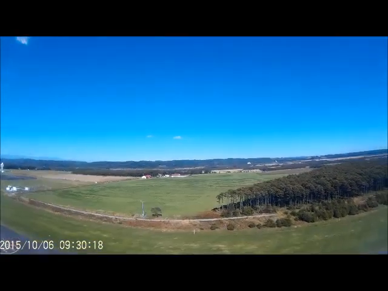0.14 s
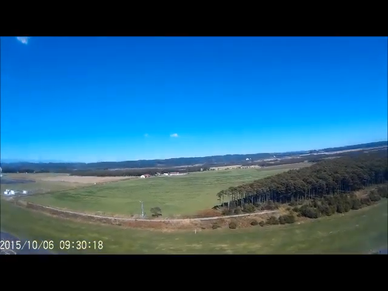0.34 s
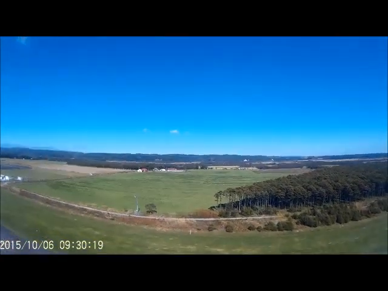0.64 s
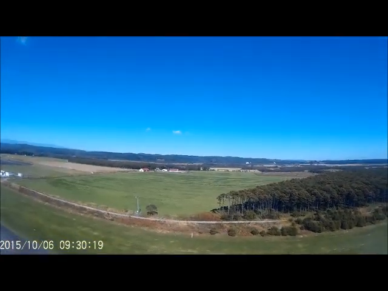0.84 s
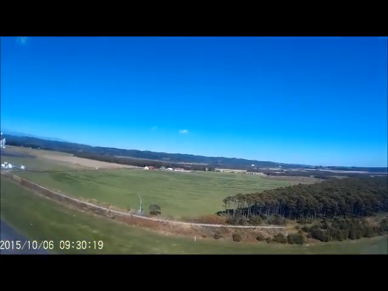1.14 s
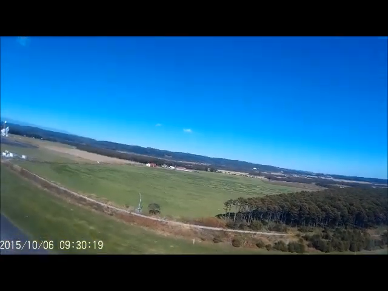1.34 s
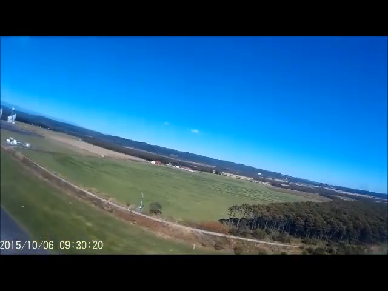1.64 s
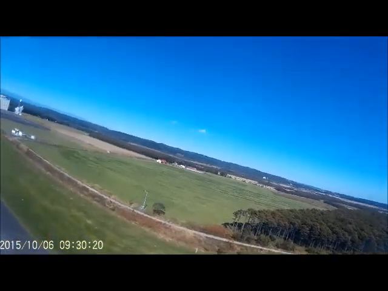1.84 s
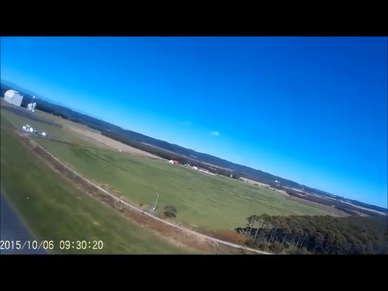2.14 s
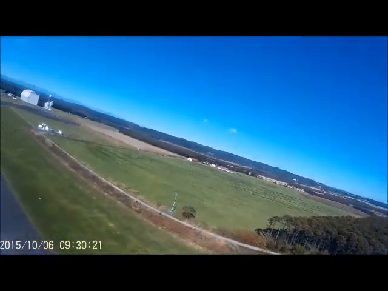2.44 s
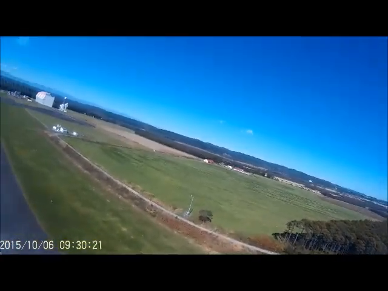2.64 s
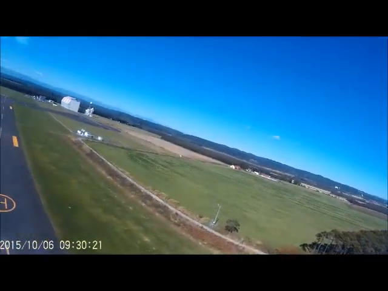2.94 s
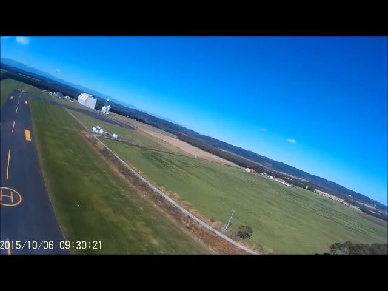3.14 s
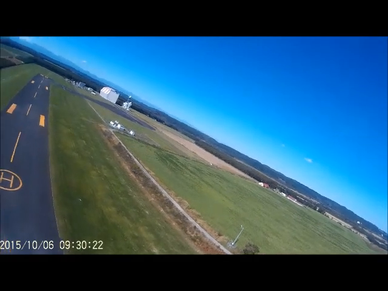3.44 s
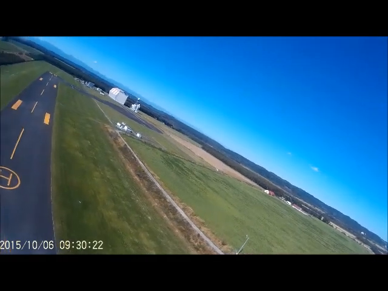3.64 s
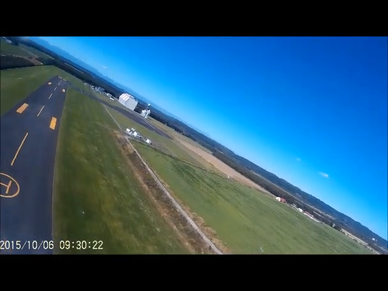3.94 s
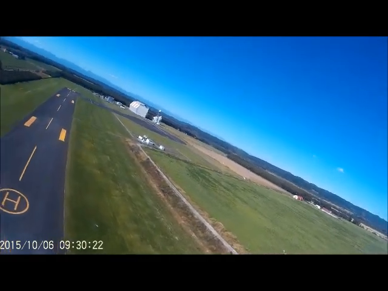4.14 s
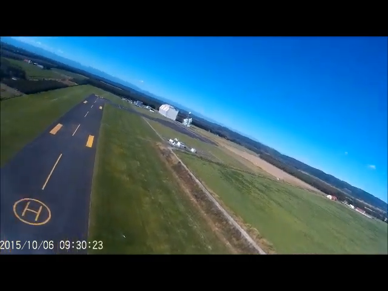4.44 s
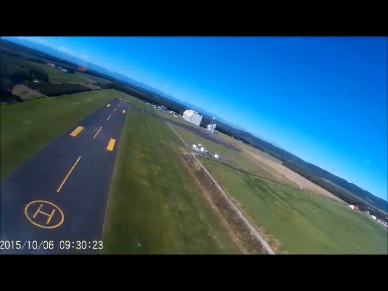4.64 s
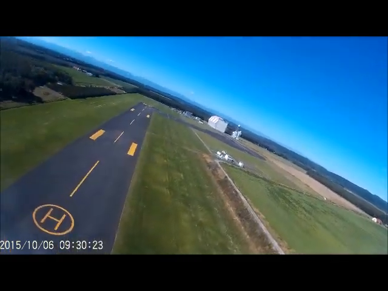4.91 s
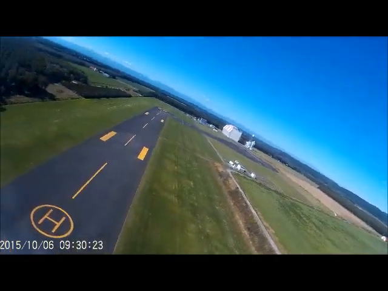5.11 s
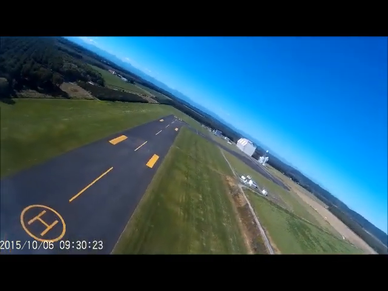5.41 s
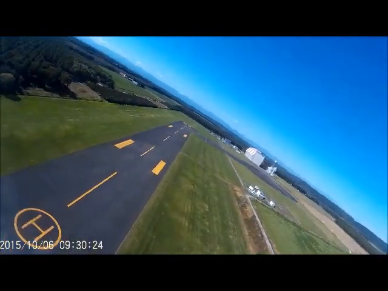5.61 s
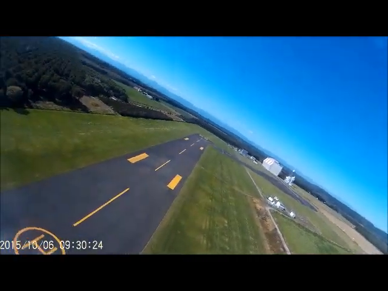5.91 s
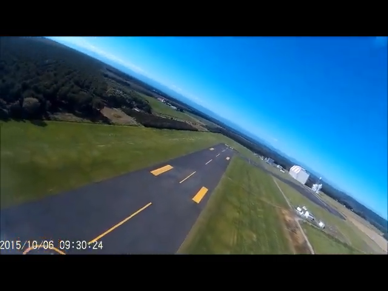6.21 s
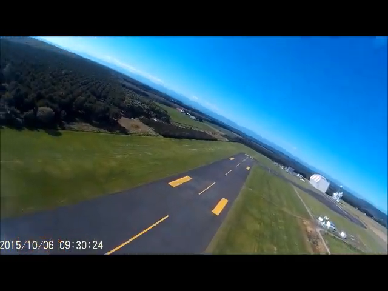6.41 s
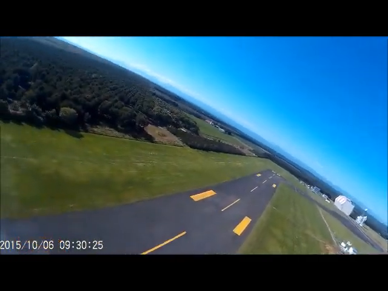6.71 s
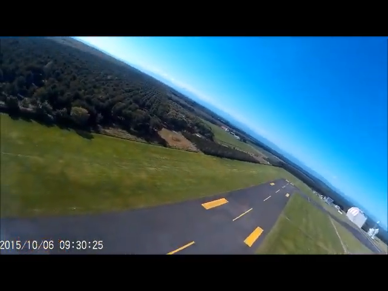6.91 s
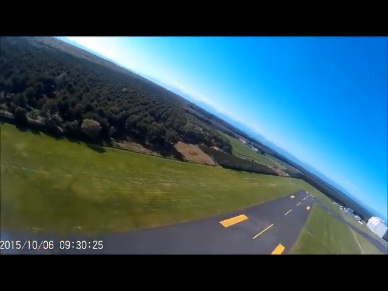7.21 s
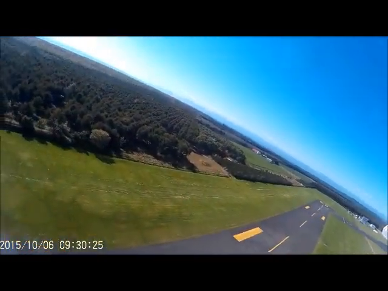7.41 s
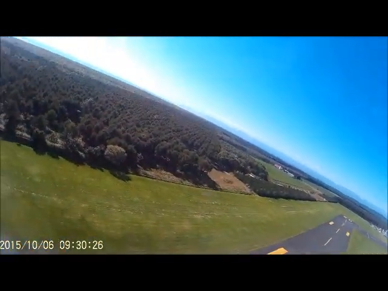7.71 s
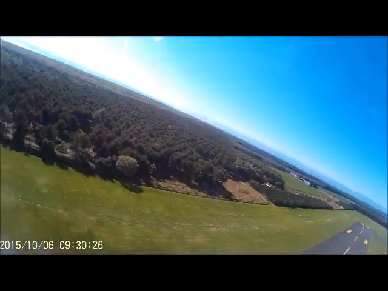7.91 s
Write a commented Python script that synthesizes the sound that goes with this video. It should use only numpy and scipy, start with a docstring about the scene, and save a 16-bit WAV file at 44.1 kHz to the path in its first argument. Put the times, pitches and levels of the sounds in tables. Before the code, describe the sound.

A small electric model plane flies over an airfield, heard from a microphone fixed to its body. The propeller drones and the motor whines without a break, the pitch wavering over a soft rush of air. About halfway through, the pitch sinks a little and the whine stands out more. The panels buzz lightly, the airstream slowly grows, and the body ticks once just past the middle and again at the end.

```python
"""A propeller's drone and a motor's whine, close up: a small electric model plane banks over an airfield,
heard from the microphone of a camera fixed to its airframe. One shaft turns the two blades and the
14-pole motor and sets their pitch; the throttle eases back halfway through. The blades shake the frame,
and the harder the shake, the more the panels buzz and the camera mount chatters.
The airstream slowly grows, and the frame ticks twice."""
import sys
import numpy as np
from scipy import signal
from scipy.fft import rfft, irfft, next_fast_len
from scipy.io import wavfile
from scipy.ndimage import uniform_filter1d, map_coordinates

SR = 44100
rng = np.random.default_rng(int(sys.argv[2]) if len(sys.argv) > 2 else 0)


def generate_wav(signal):
    """Clip the signal to [-1, 1] and save it as 16-bit WAV at the path in sys.argv[1]."""
    frames = np.transpose(np.atleast_2d(signal))
    scaled = np.clip(frames, -1, 1) * 32767
    pcm = np.round(scaled).astype(np.int16)
    wavfile.write(sys.argv[1], SR, pcm)


N = 355446
USUAL_SHAKE_DB = -30  # blade tone level at which shake_db is 0; every "grows" is dB per dB of shake


def amp(db):
    """Decibels to gain."""
    return 10 ** (np.asarray(db) / 20)


def unit(x):
    """Scale to rms 1."""
    return x / np.sqrt(np.mean(x ** 2) + 1e-20)


def curve(rows):
    """Join (time, value) rows with straight lines, one value per sample."""
    return np.interp(np.arange(N) / SR, *np.transpose(rows))


def wobble(knots_per_s):
    """A smooth random curve."""
    return map_coordinates(rng.standard_normal(4000), [np.arange(N) * knots_per_s / SR], mode="wrap")


def noise():
    """White noise of rms 1."""
    return rng.standard_normal(N)


def tone(cycles):
    """A sine of rms 1 that starts anywhere in its cycle."""
    return np.sqrt(2) * np.sin(2 * np.pi * (cycles + rng.random()))


def partial(turns, level_db, flutter_db, order):
    """One multiple of the shaft speed, locked to the shaft angle and fluttering in the turbulent inflow."""
    return amp(level_db + flutter_db * wobble(24)) * np.sqrt(2) * np.sin(2 * np.pi * order * turns)


def by_throttle(throttle, slow_db, fast_db):
    """A level between its slow and its fast setting."""
    return slow_db + throttle * (fast_db - slow_db)


def filtered(x, response):
    """Shape the spectrum of x by a gain that depends on frequency."""
    size = next_fast_len(N + 8192)
    return irfft(rfft(x, size) * response(np.fft.rfftfreq(size, 1 / SR)), size)[:N]


def through(x, modes):
    """x through a set of steep-sided resonances."""
    def response(f):
        power = 0
        for hz, width, db in modes:
            detuning = (f * f - hz * hz) / (width * f + 1e-9)
            power += (amp(db) / (1 + detuning ** 2)) ** 2
        return np.sqrt(power)
    return filtered(x, response)


def resonate(x, modes):
    """x through a set of resonances, brought to rms 1."""
    return unit(through(x, modes))


def case_cutoff(x, edge_hz=1800):
    """The camera case passes little above its top resonance."""
    return filtered(x, lambda hz: 1 / (1 + (hz / edge_hz) ** 30))


def propeller(turns, speed, shake_db):
    """Two blades drone at twice the shaft speed; the overtones shift with speed, most swell with shake."""
    # overtones as the frame passes them: shaft speed/Hz, then level/dB at usual shake for orders 3 to 6
    overtone_levels = [(86.3, -39, -26.5, -35.5, -35.5), (88.93, -40.5, -25.5, -36.0, -43.5),
                       (94.5, -59.5, -32, -40, -56), (99.4, -54.5, -34.0, -48, -54.5),
                       (101.96, -37, -36.5, -42, -54.5), (104.6, -38, -38.5, -42, -62.5)]
    # how each swells: shaft order, growth/(dB per dB of shake), flutter/dB
    swell = [(3, 0, 0.5), (4, 0.37, 0.96), (5, 0.27, 2), (6, 0.89, 1.8)]
    speeds, *levels = np.transpose(overtone_levels)
    drone = partial(turns, USUAL_SHAKE_DB + shake_db, flutter_db=0.4, order=2)
    for (order, grows, flutter_db), db_at_speeds in zip(swell, levels):
        level_db = np.interp(speed, speeds, db_at_speeds) + grows * shake_db
        sign = -1 if order == 3 else 1  # shaft whirl sways the blades, inverting the lower sideband
        drone += sign * partial(turns, level_db, flutter_db, order)
    return drone


def motor(turns, throttle, play_turns=0.008):
    """Magnets whine at 14 per turn; at speed, imbalance adds shaft tone and sidebands, nearly in step."""
    # shaft order, slow level/dB, fast level/dB, flutter/dB; order 42 is a thin overtone of the whine
    orders = [(1, -53.5, -41.5, 1.3), (10, -62, -52.5, 3.5), (11, -72.5, -57.5, 4), (12, -54, -43.5, 0.5),
              (13, -54, -42.5, -0.1), (14, -33.5, -39, 0.8), (42, -92.5, -85, 1)]
    whine = np.zeros(N)
    for order, slow_db, fast_db, flutter_db in orders:
        angle = turns + play_turns * rng.standard_normal()
        whine += partial(angle, by_throttle(throttle, slow_db, fast_db), flutter_db, order)
    return whine


def controller(turns, switch_hz=7830):
    """The speed controller's switching beats with the commutation: thin whistles that swoop with speed."""
    # beats ahead of the camera case: multiple, level/dB
    beat_levels = [(1, -43), (2, -47), (3, -52), (4, -57)]
    # case resonances that let them reach the microphone: f/Hz, width/Hz, gain/dB
    case_modes = [(950, 79, -7), (1550, 130, -1.5), (1624, 430, 0)]
    switching = switch_hz * np.arange(N) / SR
    commutation = 6 * 14 * turns
    pole_ripple = 15 * 7 * turns
    slip = commutation - switching + 0.039 * wobble(45)
    beats = sum(amp(db) * tone(multiple * slip) for multiple, db in beat_levels)
    beats += amp(-52.5) * tone(pole_ripple - switching + 0.13 * wobble(45))
    return case_cutoff(through(beats, case_modes)) + amp(-95) * tone(switching)


def panel_buzz(turns, throttle, shake_db, odd_db=-4.0, grows=1.15):
    """Shaken panels buzz on the higher shaft orders that pass their modes; two blades favour even ones."""
    # panel modes that buzz: f/Hz, width/Hz, gain/dB
    buzz_modes = [(625, 91, -1), (732, 52, 5), (850, 160, 1.5), (1007, 98, 8.5), (1440, 420, -6),
                  (1750, 230, -17)]
    shaking = np.zeros(N)
    for order in np.setdiff1d(np.arange(7, 22), [10, 12, 13, 14]):
        angle = turns + rng.random() + 0.006 * wobble(20)
        shaking += partial(angle, odd_db * (order % 2), flutter_db=2.5, order=order)
    level_db = by_throttle(throttle, slow_db=-49, fast_db=-54) + grows * shake_db
    return amp(level_db) * resonate(shaking, buzz_modes)


def airstream(turns, shake_db):
    """Turbulence drives frame and panels, pulsing as each blade passes; the camera sways on its mount."""
    # strength of the airstream, growing as the plane banks: t/s, gain/dB
    air_strength = [(0, 0), (.6, 0.5), (2.6, 0), (3.5, -0.5), (4.1, 1), (4.8, 1.8), (6.3, 2), (7, 1.9),
                    (8.06, 3.6)]
    # bending modes of wing and fuselage: f/Hz, width/Hz, gain/dB
    frame_modes = [(127.7, 21, -9.5), (207.8, 65, -1), (267.6, 23, -3), (331, 20, -11.5),
                   (425.5, 148, -6.5), (525.5, 16, -9)]
    # panel and camera case resonances: f/Hz, width/Hz, gain/dB
    panel_modes = [(630, 60, -3.5), (787, 170, -3), (1025, 110, 1), (1283, 260, 2.5), (1590, 264, -2),
                   (1877, 260, -12), (2965, 520, -24), (3910, 860, -30.5), (5030, 890, -38)]
    air_db = curve(air_strength)
    wash = 1 + 0.13 * tone(2 * turns) + 0.05 * tone(turns)
    buffet_db = air_db - 33.5 + 0.054 * shake_db + 0.31 * wobble(18)
    buffet = amp(buffet_db) * resonate(noise() * wash, frame_modes)
    rush_db = air_db - 44 + 0.075 * shake_db + 0.51 * wobble(18)
    rush = amp(rush_db) * resonate(noise() * wash, panel_modes)
    sway_db = air_db - 44 + 0.2 * shake_db
    sway = amp(sway_db) * resonate(noise(), modes=[(46.6, 15, 0)])
    return buffet + rush + sway


def mount_chatter(turns, shake_db, scatter_db=5.0, scrape=0.4, grows=0.55):
    """The shaken mount chatters in fits: a tap each blade pass, harder once a turn, scraping between."""
    # the hardest bursts, bell-shaped in time: t/s, level/dB, half length/s
    hard_bursts = [(1.53, -64, 0.012), (1.694, -69, .013), (1.843, -67, .014), (2.467, -63.5, .02),
                   (2.6, -61, .03), (2.703, -66, .02), (2.89, -66, .05), (4.12, -65, 0.034),
                   (4.42, -65, .015), (4.53, -67, .033), (5.518, -67, .025), (6.074, -66.5, .01)]
    # resonances of the mount: f/Hz, width/Hz, gain/dB
    mount_modes = [(2760, 900, 0), (4030, 770, 0.5), (5000, 980, -2), (6400, 1800, -13)]
    t = np.arange(N) / SR
    blade_passes = np.diff(np.floor(2 * turns + 0.04 * wobble(200)), prepend=0) != 0
    accent = 1 + 0.55 * np.cos(2 * np.pi * turns)
    taps = unit(blade_passes * amp(scatter_db * noise()) * accent)
    fits = amp(-82.5 + grows * shake_db + 2.5 * wobble(15))
    bursts = sum(amp(db) * np.exp(-0.5 * ((t - at) / half) ** 2) for at, db, half in hard_bursts)
    return np.hypot(fits, bursts) * resonate(taps + scrape * noise(), mount_modes)


def panel_ticks(ring_hz=1440, attack_s=0.00037, t60_s=0.014):
    """Short ticks of a flexing panel, dulled by the camera case."""
    # ticks ahead of the case: t/s, peak level/dB
    flexes = [(4.585, -15), (7.9844, -16)]
    ticks = np.zeros(N)
    for start, db in flexes:
        age = np.maximum(np.arange(N) / SR - start, 0)
        rise = 1 - np.exp(-(age / attack_s) ** 2)
        ring = np.sin(2 * np.pi * ring_hz * age) * amp(-60 * age / t60_s) * rise
        ticks += amp(db) * ring / np.abs(ring).max()
    return case_cutoff(ticks)


def scene(slow_hz=91.7, fast_hz=99.7):
    """On board, in mono: one shaft drives the tones and shakes the frame, over airstream and faint hiss."""
    # shaft speed: t/s, f/Hz (turns per second)
    shaft_speed = [(0.0, 96.3), (0.12, 97.5), (0.29, 102.8), (0.65, 103.6), (0.96, 99.5), (1.09, 99.2),
                   (1.29, 103.0), (1.79, 103.2), (1.96, 100.0), (2.18, 98.6), (2.26, 102.4), (2.38, 101.7),
                   (2.46, 105.6), (2.85, 98.5), (2.97, 100.7), (3.13, 99.3), (3.35, 101.3), (3.76, 95.4),
                   (4.7, 87.5), (4.97, 88.7), (5.74, 89.2), (6.36, 86.7), (6.82, 86.5), (7.01, 90.1),
                   (7.26, 89.2), (7.38, 91.4), (7.68, 88.2), (8.06, 87.2)]
    # how hard the blades shake the frame, at 2 per turn: t/s, level/dB
    blade_shake = [(0.0, -31.5), (0.28, -34.5), (1.01, -24.6), (1.08, -31.2), (1.54, -24.5), (1.61, -34.5),
                   (1.68, -24.5), (1.96, -27), (2.04, -43), (2.08, -27.5), (2.36, -25.5), (2.5, -20),
                   (2.76, -22.5), (2.96, -21.5), (3.2, -36.5), (3.32, -25), (3.49, -46.5), (3.79, -36.5),
                   (3.88, -29), (4.57, -22.5), (4.73, -39), (5.54, -36), (5.81, -26.5), (6.59, -29.5),
                   (7.0, -42.5), (7.21, -31.5), (8.06, -31.5)]
    speed = uniform_filter1d(curve(shaft_speed), size=1500)
    turns = np.cumsum(speed) / SR
    throttle = np.clip((speed - slow_hz) / (fast_hz - slow_hz), 0, 1)
    shake_db = curve(blade_shake) - USUAL_SHAKE_DB
    drive = propeller(turns, speed, shake_db) + motor(turns, throttle) + controller(turns)
    frame = panel_buzz(turns, throttle, shake_db) + mount_chatter(turns, shake_db) + panel_ticks()
    air = airstream(turns, shake_db)
    hiss = amp(-69) * noise()
    return (drive + frame + air + hiss)[None]


def record(dry, top_hz=15400):
    """The camera keeps nothing above its band limit."""
    lowpass = signal.butter(16, top_hz, fs=SR, output="sos")
    return signal.sosfiltfilt(lowpass, dry)


dry = scene()
out = record(dry)
generate_wav(out)
```